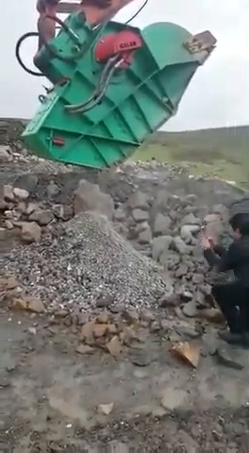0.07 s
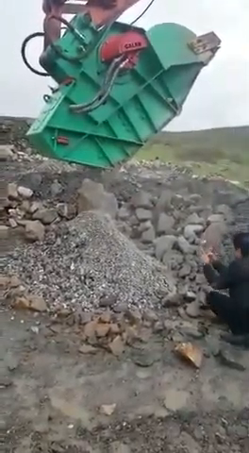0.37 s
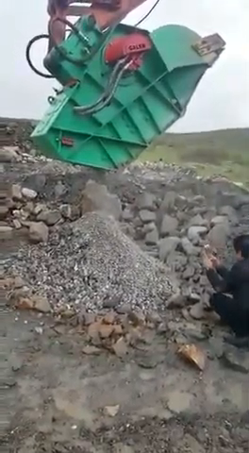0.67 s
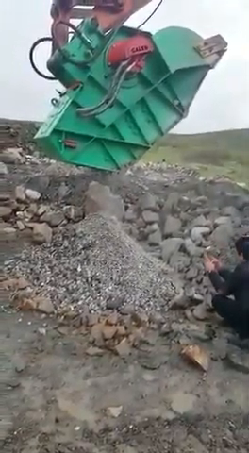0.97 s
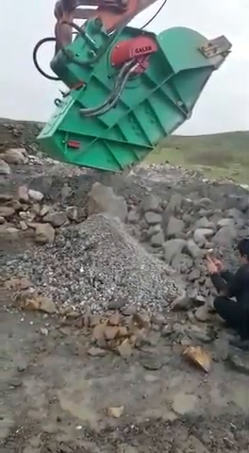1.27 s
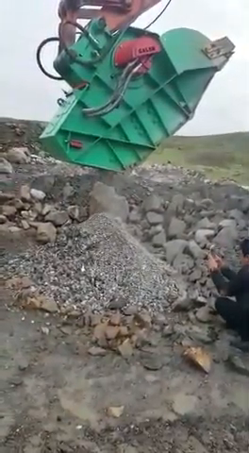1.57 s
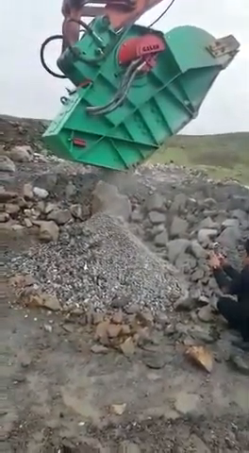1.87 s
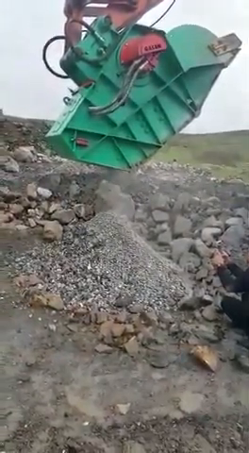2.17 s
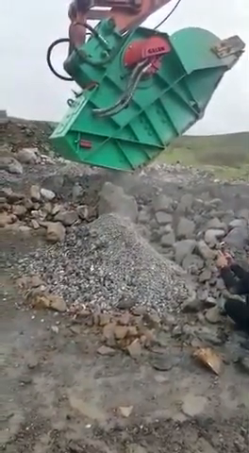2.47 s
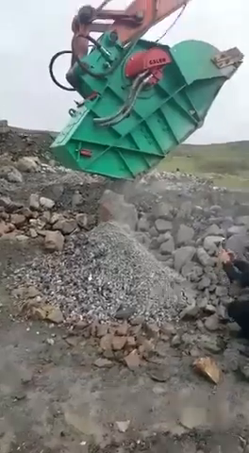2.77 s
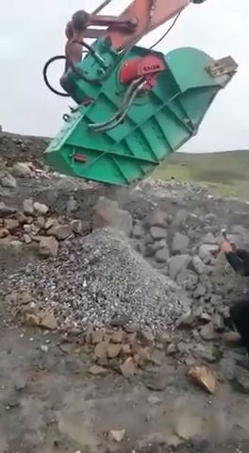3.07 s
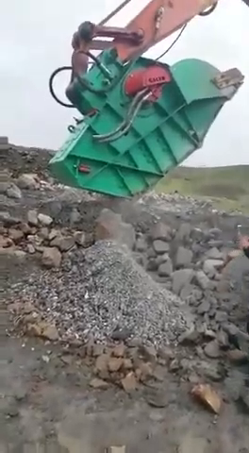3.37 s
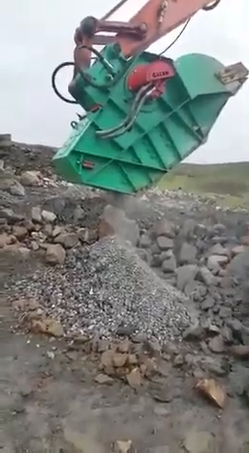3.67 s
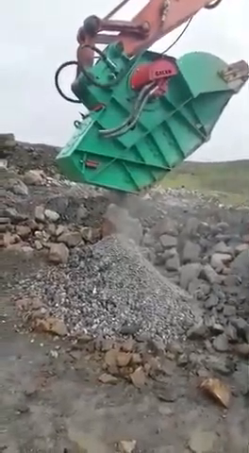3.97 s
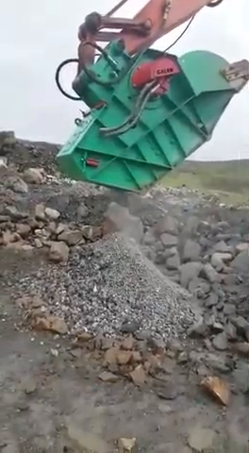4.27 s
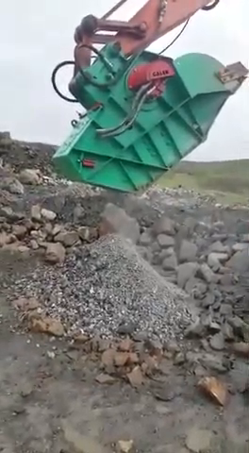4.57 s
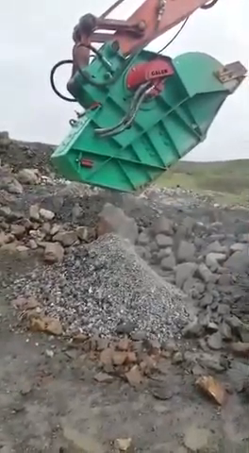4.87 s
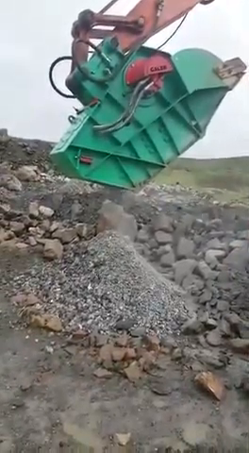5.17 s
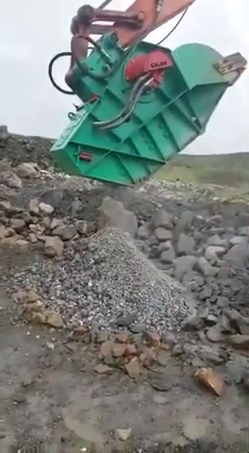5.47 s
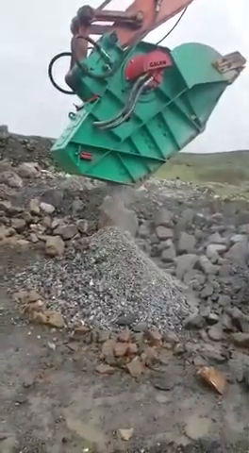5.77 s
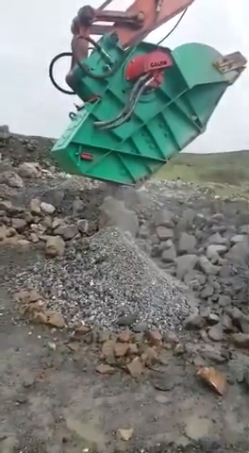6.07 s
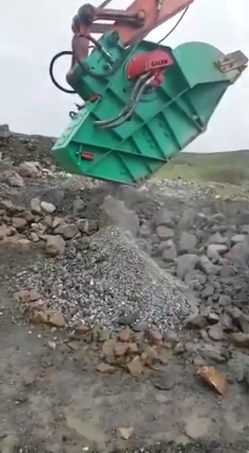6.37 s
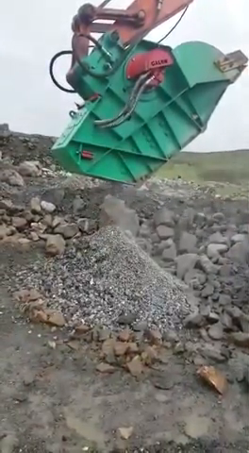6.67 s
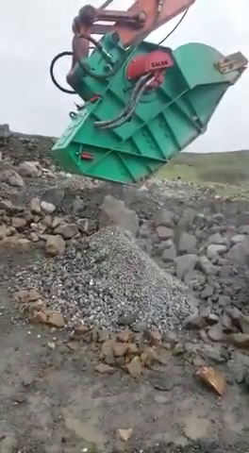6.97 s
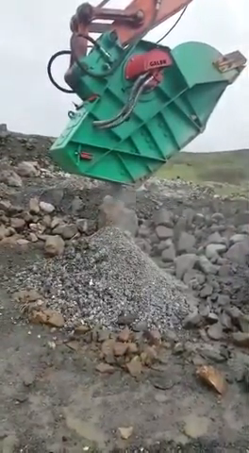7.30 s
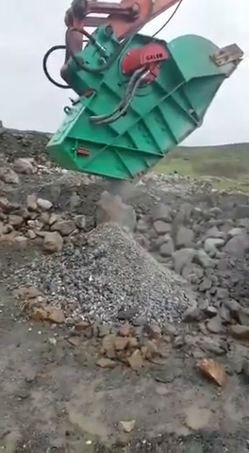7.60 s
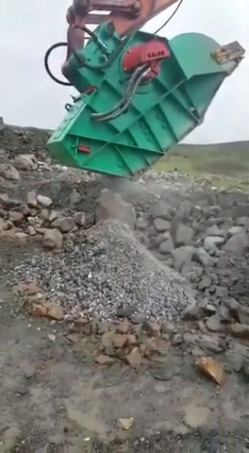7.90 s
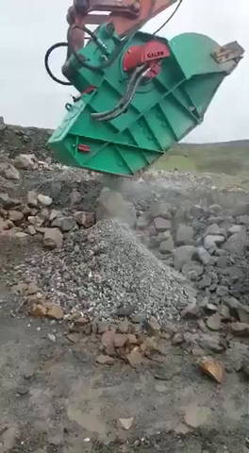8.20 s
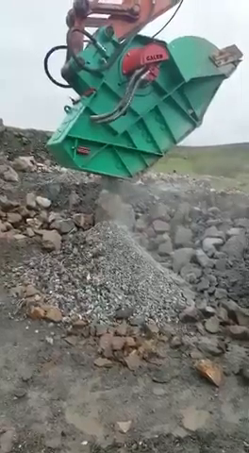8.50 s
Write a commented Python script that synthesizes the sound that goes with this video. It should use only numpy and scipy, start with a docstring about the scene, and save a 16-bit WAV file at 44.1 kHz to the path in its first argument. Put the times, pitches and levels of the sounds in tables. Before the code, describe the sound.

A crusher bucket crunches rock in a fast, steady rhythm over a droning diesel excavator, with pattering gravel and wind buffeting the microphone.

```python
"""A jaw crusher bucket on an excavator chews rock in an open quarry, a little over six bites a second.
From the start the diesel drones, gravel patters onto the heap and wind buffets a phone's two mic ports,
hardest at 2 s. Each bite is a dense burst of fractures ringing the steel bucket: splinters, crunch, boom.
After 3 s the boom grows and wedged stones make the plates clang. Near 5 s the gusts return from a lull;
hard stones snap sharply, and the jaw keeps biting to the end."""
import sys
import numpy as np
from scipy import signal
from scipy.fft import rfft, irfft
from scipy.io import wavfile
from scipy.ndimage import uniform_filter1d

SR = 44100
rng = np.random.default_rng(int(sys.argv[2]) if len(sys.argv) > 2 else 0)


def output_pcm(signal):
    """Save a mono or channel-first signal as 16-bit PCM at the path in sys.argv[1].

    Samples are clipped to [-1, 1] before scaling.
    """
    pcm = np.clip(np.atleast_2d(signal).T, -1, 1) * 32767
    wavfile.write(sys.argv[1], SR, np.round(pcm).astype(np.int16))


N = 381024
T = np.arange(N) / SR
FREQS = np.maximum(np.arange(N // 2 + 1) * SR / N, 1)


# One bite per turn of the flywheel, each on different rock:
# (time [s], squeeze length [s], crack level [dB], crunch over crack [dB], splinters over crack [dB],
#  boom level [dB], stone pitch [Hz], largest fragment's pitch [Hz], hollow notch [Hz])
BITES = [(0.007, 0.03, -19, 2.5, -17.5, -30.5, 540.0, 1450.0, 2480.0),
         (0.169, 0.039, -17, 0.5, -19.5, -33, 790.0, 2790, 2130),
         (0.338, 0.046, -21.5, 5.5, -16.5, -25.5, 615, 1420, 3120),
         (0.482, 0.049, -20, 5, -17.5, -30, 650, 1600, 1900),
         (0.645, 0.031, -23, 5.5, -15, -31, 775, 3220, 2060),
         (0.806, 0.017, -26, 5, -16.5, -31, 510, 1880, 1620.0),
         (0.971, 0.014, -27.5, 5.5, -14.5, -30.5, 600, 1670, 3160),
         (1.121, 0.03, -20.5, 1.5, -20, -27, 440, 1440, 3520),
         (1.272, 0.041, -22, 3.5, -17.5, -24.5, 590.0, 1470.0, 2940),
         (1.428, 0.053, -17, 2.5, -19, -31, 790, 1450, 3560),
         (1.592, 0.035, -26, 8, -13.5, -30.5, 855, 2780, 1650),
         (1.738, 0.046, -21.5, 5, -16.5, -25, 620.0, 1450, 2830),
         (1.9, 0.041, -20.5, 5, -15, -38, 925, 2850, 1630),
         (2.056, 0.055, -26, -1, -18.5, -37, 597.0, 1470, 2400),
         (2.239, 0.023, -21.5, -2.5, -16, -36, 790, 1770, 3620),
         (2.381, 0.018, -21.5, 3, -14.5, -35, 520.0, 1800, 2000),
         (2.54, 0.021, -24.5, -0.5, -15.5, -37, 930, 1470, 2290),
         (2.694, 0.038, -23.5, 5, -15.5, -32, 850, 1430, 2720.0),
         (2.857, 0.04, -18.5, 1.5, -14.5, -26.5, 488.0, 1710, 2720),
         (3.007, 0.044, -20, 4.0, -14.0, -27.0, 770, 1720.0, 2300),
         (3.161, 0.046, -20.5, 6.5, -17.5, -26.5, 540, 2900, 1970),
         (3.325, 0.063, -22, 8, -15, -22, 676, 3100, 1470),
         (3.484, 0.053, -19.5, 4, -19.5, -19.5, 480, 1640, 2630),
         (3.635, 0.058, -21, 6.5, -16, -28, 485.0, 1650.0, 2850.0),
         (3.796, 0.068, -21, 6.5, -17, -23.0, 860, 1700, 2110.0),
         (3.95, 0.051, -21.5, 2.5, -17.0, -21.5, 522.0, 1650, 1460),
         (4.11, 0.048, -20.0, 3, -17.5, -23.0, 530, 2020, 2530),
         (4.265, 0.054, -20.0, 2.5, -15.0, -23, 805, 1650, 1410),
         (4.432, 0.039, -18.5, 1.5, -18, -19, 497, 1610, 1770),
         (4.585, 0.054, -21.5, 5, -14.5, -20.5, 475, 1580, 1610),
         (4.741, 0.049, -23.5, 5.5, -15.5, -20.5, 560, 2750, 1810),
         (4.897, 0.061, -23.5, 4.5, -16, -21.5, 478.0, 2110, 1670),
         (5.051, 0.071, -21.5, 7, -15.0, -20, 467, 2290, 2870),
         (5.213, 0.059, -18, 3.5, -15.0, -20, 480, 2390.0, 2880),
         (5.367, 0.071, -27.5, 7.5, -8.5, -33.0, 413, 1280, 1660),
         (5.528, 0.062, -24, 6.5, -11.5, -25, 480, 3090.0, 1660),
         (5.677, 0.064, -21, 4.5, -15, -26, 460, 2400, 3080.0),
         (5.841, 0.051, -22.5, 6.0, -14.5, -22, 560, 1600, 2550),
         (6, 0.046, -21, 4, -18.5, -25.0, 410, 1610, 2710),
         (6.166, 0.057, -20.0, 6, -16.5, -24.0, 500, 1730, 2090.0),
         (6.325, 0.025, -21, 6.5, -17, -31, 476, 1920, 1660),
         (6.479, 0.038, -26.5, 7.5, -12.5, -27, 545, 2950, 1850.0),
         (6.634, 0.041, -19.0, 2.5, -18, -27, 590.0, 2770, 1850),
         (6.79, 0.047, -25, 5.5, -10.5, -26.5, 523.0, 3250, 1690),
         (6.954, 0.043, -22.0, 4, -18, -23.5, 525.0, 1520.0, 2170),
         (7.108, 0.058, -20.5, 2.5, -15.5, -22.5, 533.0, 1400, 3270.0),
         (7.262, 0.051, -21, 6.5, -14.5, -24, 560, 2300, 1720),
         (7.426, 0.052, -19.0, 1.5, -15, -21.5, 484, 2980.0, 2720),
         (7.581, 0.064, -20.0, 2, -17, -18, 507, 2720, 3230),
         (7.744, 0.036, -19.0, 2.0, -15.5, -27, 503, 1930, 2550),
         (7.899, 0.045, -22, 6, -13.5, -24.5, 570, 1810.0, 1540),
         (8.054, 0.049, -18.0, 4.0, -18.5, -28, 450, 1860, 1186),
         (8.212, 0.041, -20.5, 6, -16.5, -25.5, 514, 1640.0, 1390),
         (8.373, 0.028, -20.5, 3, -16, -26.0, 470, 1680.0, 2380),
         (8.544, 0.0057, -23, 4.0, -14, -30, 580, 1670, 2260)]

def jaw(lead_s=.02, stone_db=-6, stone_width_hz=75):
    """Each bite spits bright splinters first, then crunches; the shell's boom lasts longest."""
    out, steel = np.zeros((2, N)), shell()
    t = T[:SR // 3] - lead_s
    loud_part = (t > 0) & (t < .075)  # each layer's rms is set here
    for s, length, crack_db, weight_db, brittle_db, boom_db, stone_hz, ring_hz, hollow_hz in BITES:
        fractures = grains(rate=5000, spread_db=2.9, ring_t60=.035, ring_db=1, size=len(t))
        clank = undb(stone_db) * resonate(fractures, stone_hz, stone_width_hz)
        rock = hollow_ring(fractures + clank + shards(fractures), hollow_hz, ring_hz)
        boom = band(rock, 66, 313) * squeeze(t, .0077, .067, t60=.4, rise_s=.018)
        crunch = band(rock, 443, 1194) * squeeze(t, .0071, 1.22 * length, t60=.3, rise_s=.012)
        crack = band(rock, 1877, 3980) * squeeze(t, .0086, 1.06 * length, t60=.25, rise_s=.008)
        splinters = band(rock, 5000, 9800) * squeeze(t, .0032, .7 * length, t60=.2, rise_s=.0048)
        levels = boom_db, crack_db + weight_db, crack_db, crack_db + brittle_db
        for layer, db in zip((boom, crunch, crack, splinters), levels):
            layer = signal.fftconvolve(layer, steel)[:, :len(t)]
            add(out, s - lead_s, undb(db) * layer / layer[:, loud_part].std(axis=1, keepdims=True))
    return out


def squeeze(t, break_s, hold_s, t60, rise_s=.016, grip_db=-22, sag_db_per_s=45):
    """Envelope of a bite: the jaw grips, the stone gives way and keeps breaking, the tail dies."""
    grip = undb(grip_db) * (1 + np.tanh((t + .01) / .005))
    attack = 1 + np.tanh((t - break_s) / rise_s)
    sag = undb(-sag_db_per_s * np.clip(t, 0, hold_s))
    return (grip + attack) * sag * fade(t - hold_s, t60)


def shards(fractures, lo_hz=950, hi_hz=4400, width_hz=24, shard_db=-1, count=5):
    """Small pieces of the stone ring briefly, each at its own pitch."""
    pitches = lo_hz * (hi_hz / lo_hz) ** rng.random(count)
    return undb(shard_db) * sum(resonate(fractures, hz, width_hz) for hz in pitches)


def hollow_ring(x, hollow_hz, ring_hz, width_hz=330, ring_width_hz=60, ring_db=-2):
    """The largest fragment rings dead centre; one band cancels between the ports and sounds hollow."""
    mid, side = x
    ring = undb(ring_db) * resonate(mid, ring_hz, ring_width_hz)
    for _ in range(2):
        mid = mid - resonate(mid, hollow_hz, width_hz)
    side = side + .5 * resonate(side, hollow_hz, width_hz) - resonate(side, ring_hz, ring_width_hz)
    return np.array([mid + ring, side])


# Ringing modes of the bucket plates: (pitch [Hz], width [Hz], level over the dry hit [dB])
PLATE_MODES = [(170.5, 50, -1.5), (202, 12, -2), (223, 6.7, -14.5), (268.4, 8.4, 0), (384, 39, -1.5),
               (482.6, 17, -3.5), (595, 44, -18), (784.3, 24.6, 7.5), (896, 82, 1), (1180, 64, -4),
               (1320, 38, 0), (5890, 1160, -0.5)]
# Tone of rock breaking in the steel shell: (frequency [Hz], gain [dB])
SHELL_EQ = [(40, -44.5), (100, -14.5), (150, -10), (200, -6), (320, -5.5), (450, 0), (610, 0), (700, -9.5),
            (760, -8), (900, -7.5), (1060, -10), (1400, -4.5), (1750, -9), (2400, -14.5), (3700, -22.5),
            (4700, -27), (7000, -33), (8600, -29), (10200, -37)]

def shell():
    """Impulse response of the bucket: the colour of rock on steel, and plates that ring on."""
    tap = signal.unit_impulse(N)
    ringing = sum(undb(db) * resonate(tap, hz, width) for hz, width, db in PLATE_MODES)
    return colour(tap + ringing, along(SHELL_EQ))[None, :SR // 8]


# Sharp accents from hard stones: (time [s], peak level [dB])
STONE_SNAPS = [(0.486, -11.5), (1.448, -13), (1.755, -17), (1.9, -24), (2.384, -23), (2.707, -33),
               (2.868, -18), (3.333, -27), (3.493, -30), (3.814, -22), (4.125, -30), (5.374, -11.5),
               (5.695, -10.5), (5.859, -16), (6.328, -22), (6.636, -19), (6.985, -15), (7.273, -16.5),
               (7.596, -13), (7.913, -11), (8.377, -13)]

def snaps(t60=.11, body_hz=2600, body_width_hz=2200, body_db=4):
    """A hard stone gives way at once: a gritty, bright transient at the front of the bite."""
    out, t = np.zeros((2, N)), T[:SR // 12]
    for s, db in STONE_SNAPS:
        grit = grains(rate=4000, spread_db=2, ring_t60=.01, ring_db=0, size=len(t))
        body = undb(body_db) * resonate(grit, body_hz, body_width_hz)
        snap = (band(grit, 1500, 10000) + body) * fade(t, t60)
        add(out, s, undb(db) * snap / np.abs(snap).max())
    return out


# Metallic accents from single plates: (time [s], level [dB], pitch [Hz])
PLATE_CLANGS = [(0.5, -24, 640), (3.33, -32, 777), (3.502, -25, 281), (4.28, -29, 772), (4.278, -22.5, 213),
                (4.44, -28, 195), (4.599, -27, 202), (7.119, -28, 231), (7.598, -34, 232)]

def clangs(width_hz=14, hold_s=.033, t60=.3, lead_s=.02):
    """A wedged stone drives one plate, which sings out for the length of a bite."""
    out, t = np.zeros((2, N)), T[:SR // 4] - lead_s
    for s, db, hz in PLATE_CLANGS:
        plate = unit(resonate(rng.standard_normal((2, len(t))), hz, width_hz))
        add(out, s - lead_s, undb(db) * plate * squeeze(t, .004, hold_s, t60))
    return out


# Fader ride of the gravel stream: (time [s], level [dB])
PATTER_RIDE = [(0, -45), (1, -47), (2.5, -47.5), (2.8, -43), (3.5, -41.5), (4.2, -46), (5.8, -42),
               (6.5, -50), (7.4, -44.5), (8.6, -44)]
# Single chips landing: (time [s], peak level [dB], pitch [Hz])
CHIP_TICKS = [(0.2926, -22, 4390), (0.596, -22, 8800), (1.5589, -25, 4390), (2.3396, -17.5, 6200),
              (2.7746, -21, 3230), (2.935, -20, 4040), (3.2994, -32, 4230), (3.745, -20, 5960),
              (4.567, -31, 6000), (4.832, -26, 5120), (5.312, -41, 7000), (5.795, -27, 6060),
              (6.597, -33, 5500), (8.177, -29, 7500), (8.6253, -23, 8000)]

def gravel():
    """Crushed stone streams onto the heap: a fine patter, and single chips that tick."""
    patter = grains(rate=900, spread_db=1.8, ring_t60=.025, ring_db=9, size=N)
    ride = undb(np.interp(T, *np.transpose(PATTER_RIDE)))
    out = ride * unit(band(patter, 2900, 18000, order=1))
    t = T[:SR // 20]
    for s, db, hz in CHIP_TICKS:
        noise = rng.standard_normal((2, len(t)))
        tone = unit(resonate(noise, hz, width_hz=1300))
        tick = (tone + 3.4 * unit(band(noise, 3000, 15000))) * fade(t, t60=.019)
        add(out, s, undb(db) * tick / np.abs(tick).max())
    return out


# Tone of the turbulence at a port: (frequency [Hz], gain [dB])
WIND_EQ = [(20, -20.5), (45, -10.5), (90, -2.5), (200, -1.5), (450, 3), (750, -2), (1300, -11.5),
           (2000, -20.5), (4000, -46.5), (9000, -53.5)]

def wind(flutter_db=3, eddy_hz=480, strong_db=-26.5):
    """Eddies hit each port separately; a stronger gust sheds smaller ones and sounds brighter."""
    gust_db = gusts()
    air = unit(colour(rng.standard_normal((2, N)), along(WIND_EQ)))
    rumble = signal.sosfiltfilt(signal.butter(2, eddy_hz, fs=SR, output="sos"), air)
    rush = (air - rumble) * undb(np.minimum(gust_db - strong_db, 4))
    flutter = unit(undb(flutter_db * np.array([walk(100), walk(70)])))
    return (rumble + rush) * flutter * undb(gust_db)


# Gusts on the phone: (time fully up [s], hold [s], level [dB])
GUST_CUES = [(0, 0.29, -22.5), (0.467, 0.015, -31), (0.642, 0.034, -25.5), (1.163, 0.026, -23.5),
             (1.254, 0.04, -22.5), (1.314, 0.079, -20), (1.437, 0.17, -23.5), (1.643, 0.05, -19),
             (1.769, 0.061, -15.5), (1.868, 0.023, -21), (1.916, 0.053, -26), (2.019, 0.076, -12),
             (2.132, 0.017, -17.5), (2.203, 0.011, -24.5), (2.247, 0.033, -23.5), (2.356, .06, -30),
             (2.547, 0.11, -22.5), (2.722, 0.067, -19.5), (2.844, 0.051, -23), (2.89, 0.077, -23),
             (3.05, 0.03, -25), (3.139, 0.023, -26.5), (3.586, 0.019, -25.5), (3.71, 0.041, -28),
             (3.888, 0.032, -34), (4.95, 0.03, -21), (5.023, 0.029, -17.5), (5.296, 0.029, -24),
             (5.396, 0.077, -23), (5.562, 0.088, -25.5), (5.893, 0.041, -23.5), (6.015, 0.084, -24),
             (6.17, 0.1, -26.5), (6.343, 0.07, -24), (6.566, 0.045, -30), (7.17, .04, -29),
             (7.45, 0.047, -36), (7.598, 0.027, -35), (7.82, 0.097, -28.5), (8.06, 0.037, -27),
             (8.3, 0.07, -26.5), (8.569, 0.034, -27)]

def gusts(attack_s=.049, release_s=.06, breeze_db=-42.5, buffet_db=3, buffets_per_s=24):
    """Wind level in dB: gusts swell, hold and die away over a light breeze, never quite steady."""
    power = undb(breeze_db) ** 2
    for s, hold, db in GUST_CUES:
        swell = np.interp(T, [s - attack_s, s, s + hold, s + hold + release_s], [0, 1, 1, 0])
        power = power + (undb(db) * swell) ** 2
    return 10 * np.log10(power) + buffet_db * walk(buffets_per_s)


# Bed of diesel, pump and fan: (frequency [Hz], gain [dB])
DRONE_EQ = [(20, -27), (45, -17), (80, -6), (120, -4), (170, 1), (320, -5), (520, 1), (900, -5),
            (1500, -13), (2300, -13), (3300, -22), (5000, -30), (10000, -34)]
# Hums and whines in the bed: (pitch [Hz], level [dB], wander [share of pitch])
ENGINE_TONES = [(81, -50, .03), (160, -41, .015), (220, -35, .015), (785, -41, .003), (2630, -59, .002),
                (4390, -62, .003)]

def excavator(drone_db=-32):
    """Dense diesel clatter with the slightly wandering tones of engine and hydraulics."""
    clatter = grains(rate=1800, spread_db=1.5, ring_t60=.04, ring_db=11.5, size=N)
    out = undb(drone_db) * unit(colour(clatter, along(DRONE_EQ)))
    for hz, db, wander in ENGINE_TONES:
        phase = 2 * np.pi * np.cumsum(hz * (1 + wander * walk(12))) / SR
        tremble = undb(6.9 * walk(27))
        out[0] += undb(db) * unit(np.sin(phase) * tremble)  # mid only
    return out


# Usual likeness of the machine at the two ports: (frequency [Hz], correlation [-1..1])
PORT_LIKENESS = [(50, .8), (200, .985), (550, .985), (850, .9), (1200, .5), (1350, -.6), (1480, -.85),
                 (1630, -.3), (1780, -.8), (2000, -.15), (2250, -.35), (2480, -.05), (2700, -.7),
                 (3000, -.4), (3250, -.65), (3500, .4), (4150, -.2), (4650, .45), (5600, -.25), (7000, 0)]

def stereo_width(x, drift=1.08, patch_hz=115, patch_s=.057, from_hz=1100, to_hz=4200):
    """Port likeness balances mid against side; the upper mids shift in patches, like moving echoes."""
    frames = dict(fs=SR, nperseg=1024, noverlap=768)
    hz, t, spectrum = signal.stft(x, **frames)
    patches = rng.standard_normal(spectrum.shape[1:])
    for axis, size in ((0, patch_hz / hz[1]), (1, patch_s / t[1])):
        window = signal.windows.gaussian(41, size / 3)
        patches = signal.fftconvolve(patches, np.expand_dims(window, 1 - axis), "same", axes=axis)
    spread = (drift / (1 + (from_hz / np.maximum(hz, 1)) ** 8 + (hz / to_hz) ** 8))[:, None]
    usual = np.arctanh(np.interp(hz, *np.transpose(PORT_LIKENESS)))[:, None]
    alike = np.tanh(usual * np.sqrt(1 + spread ** 2) + spread * unit(patches))
    shares = np.maximum(np.array([1 + alike.T, 1 - alike.T]) / 2, 1e-3)
    gains = causal(10 * np.log10(shares)).swapaxes(1, 2)
    return signal.istft(spectrum * gains, **frames)[1][:, :N]


def grains(rate, spread_db, ring_t60, ring_db, size):
    """Mid and side crackle: random clicks of uneven size, each with a short scattered tail."""
    hits = rng.random(size) < rate / SR
    sizes = hits * undb(spread_db * np.minimum(rng.exponential(size=size), 3))
    t = T[:SR // 20]
    scatter = rng.standard_normal((2, len(t))) * fade(t, ring_t60)
    scatter *= undb(ring_db) / np.linalg.norm(scatter, axis=1, keepdims=True)
    scatter[:, 0] += 1  # the dry click
    clicks = sizes * rng.standard_normal((2, size))
    return unit(signal.fftconvolve(clicks, scatter, axes=-1)[:, :size])


def walk(rate):
    """Smooth random drift of rms 1."""
    size = int(SR / rate)
    drift = uniform_filter1d(rng.standard_normal(N), size, mode="wrap")
    return unit(uniform_filter1d(drift, size, mode="wrap"))


def undb(db):
    """Decibels to gain."""
    return 10 ** (np.asarray(db) / 20)


def unit(x):
    """Scale to rms 1."""
    return x / np.sqrt(np.mean(x ** 2) + 1e-18)


def along(points):
    """An EQ curve read at every frequency."""
    hz, value = np.transpose(points)
    return np.interp(np.log(FREQS), np.log(hz), value)


def colour(x, db):
    """Apply an EQ curve."""
    return irfft(rfft(x) * causal(db), N)


def causal(db):
    """Minimum-phase response for the gains along the last axis: no pre-ring."""
    cepstrum = irfft(db * np.log(10) / 20)
    half = cepstrum.shape[-1] // 2
    cepstrum[..., 1:half] *= 2
    cepstrum[..., half + 1:] = 0
    return np.exp(rfft(cepstrum))


def resonate(x, hz, width_hz):
    """One resonance, gain 1 at its centre."""
    return signal.lfilter(*signal.iirpeak(min(hz, SR / 3), hz / width_hz, fs=SR), x)


def band(x, lo_hz, hi_hz, order=3):
    """Band-pass."""
    return signal.sosfilt(signal.butter(order, [lo_hz, hi_hz], "band", fs=SR, output="sos"), x)


def fade(t, t60):
    """Free decay from time 0."""
    return np.exp(-np.log(1000) * np.maximum(t, 0) / t60)


def add(out, s, x):
    """Mix x into out at time s."""
    i = max(int(s * SR), 0)
    out[:, i:i + x.shape[1]] += x[:, :max(N - i, 0)]


# Panning of the machine's treble: (frequency [Hz], left over right [dB])
TREBLE_PAN = [(1800, 0), (3800, -1), (4900, 1.5), (6000, -5), (6900, -1.5), (7600, 1.5), (8300, -9),
              (9500, 4), (10200, 1.5)]

def scene():
    """Mix the machine in mid and side, decode to left and right, and lay the wind on top."""
    machine = stereo_width(jaw() + clangs() + excavator())
    grit = np.sqrt(.5) * (snaps() + gravel())
    mid, side = rfft(machine + grit)
    pan = undb(along(TREBLE_PAN) / 2)
    return irfft(np.array([(mid + side) * pan, (mid - side) / pan]), N) + wind()


def record(dry):
    """The phone clips at full scale and cuts the top above 10250 Hz."""
    high_cut = signal.ellip(10, .2, 80, 10250, fs=SR, output="sos")
    return signal.sosfilt(high_cut, np.clip(dry, -1, 1))


dry = scene()
out = record(dry)
output_pcm(out)
```